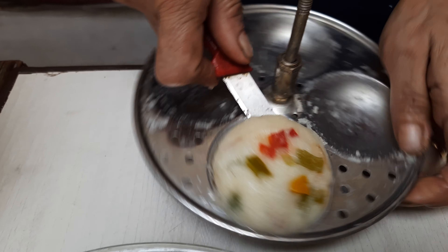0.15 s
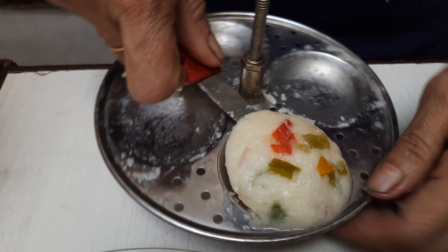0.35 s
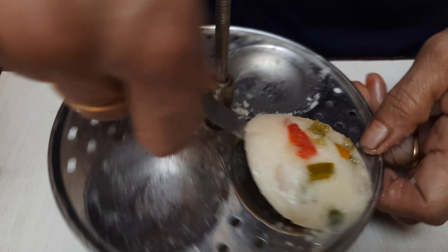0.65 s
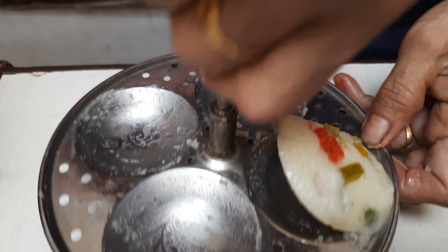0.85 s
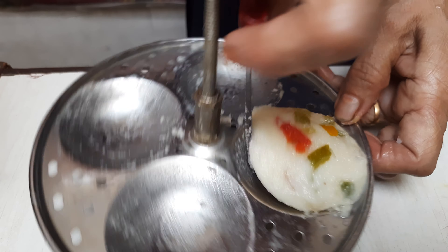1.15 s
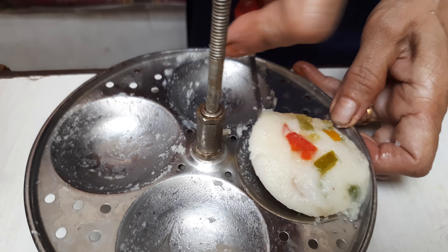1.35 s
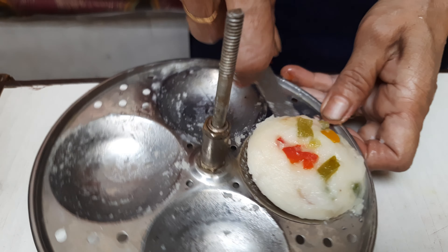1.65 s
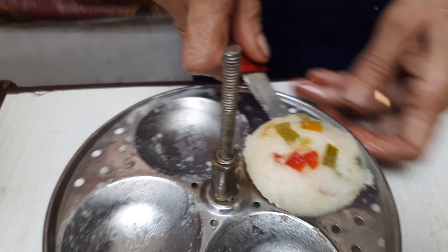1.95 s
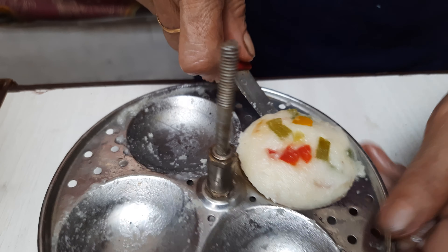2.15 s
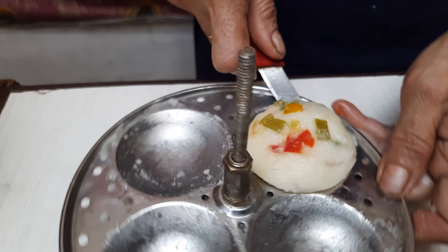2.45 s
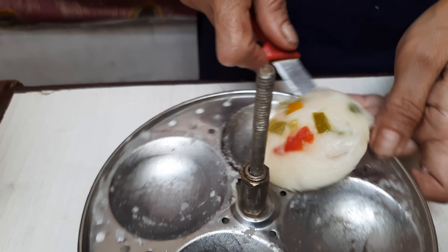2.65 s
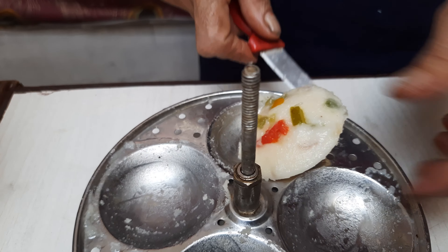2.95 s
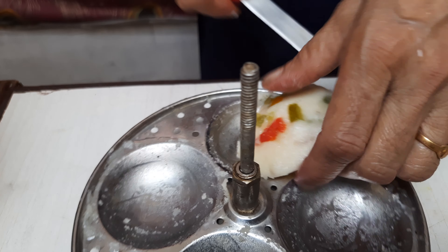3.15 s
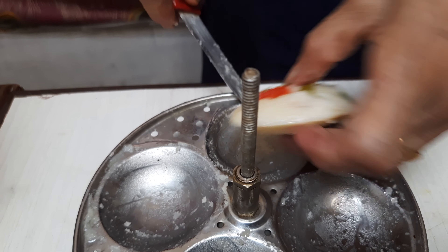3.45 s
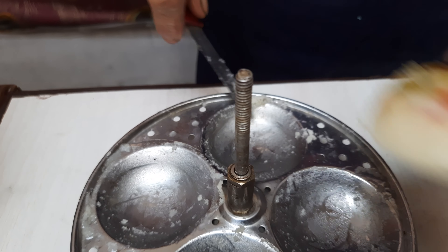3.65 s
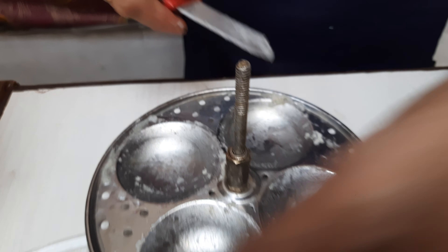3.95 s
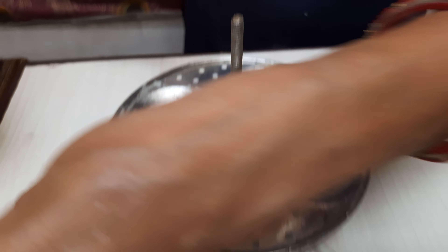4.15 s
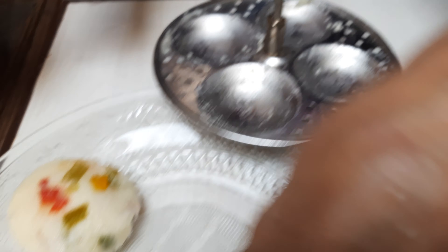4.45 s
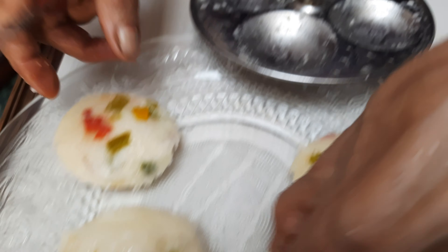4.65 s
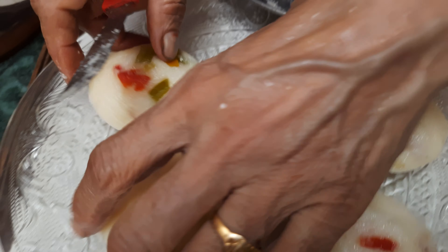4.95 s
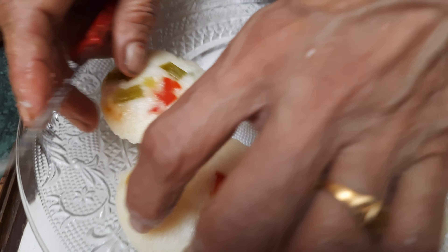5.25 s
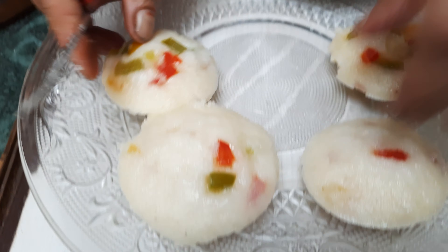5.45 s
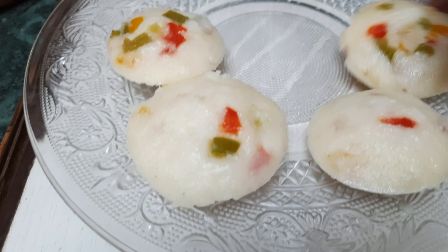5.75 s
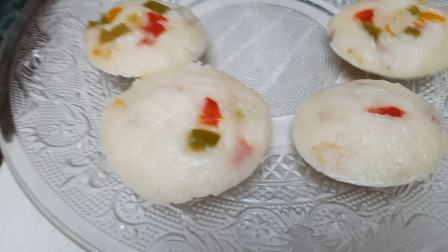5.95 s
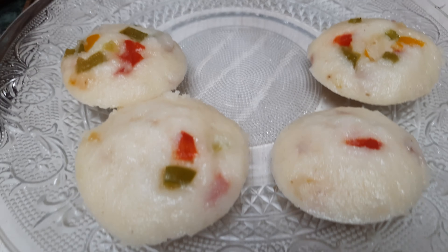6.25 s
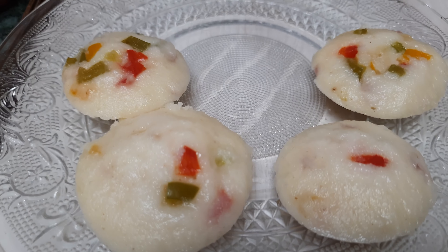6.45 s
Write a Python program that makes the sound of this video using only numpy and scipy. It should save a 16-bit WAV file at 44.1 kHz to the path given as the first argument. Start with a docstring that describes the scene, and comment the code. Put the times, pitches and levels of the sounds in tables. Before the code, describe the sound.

Close metallic scraping, hollow clanks and tiny bangle tinks as a steamed cake is pried loose, set softly on glass, before the steel mould clatters down.

```python
"""Prying a rice cake from a steel mould

A steamed rice cake is pried out of a hand-held steel idli mould with a knife, close by in a small kitchen.
The blade scrapes and knocks, made of friction clicks and short blows that ring banks of steel modes.
The mould bumps on the table, bangles tink as very high partials, and the cake lands on a glass plate
as dull noise pats. At the end the mould clatters down and rings, over room air and a wavering drone.
"""
import sys
import numpy as np
from scipy import signal
from scipy.fft import rfft, irfft
from scipy.io import wavfile

SR = 44100
rng = np.random.default_rng(int(sys.argv[2]) if len(sys.argv) > 2 else 0)


def to_wav(s):
    """Save 16-bit WAV."""
    ch = np.atleast_2d(s).T  # columns
    pcm = np.round(np.clip(ch, -1, 1) * 32767)  # PCM
    wavfile.write(sys.argv[1], SR, pcm.astype(np.int16))


N = 290178
TIME = np.arange(N) / SR
RING_TIME = np.arange(SR // 2) / SR  # half a second for every single hit

# Quiet room air. Each row: frequency in Hz, relative level in dB.
AIR_SPECTRUM = [(15, -63), (25, -28.5), (76, -9), (123, -14.5), (157, -20.5), (180, -22.5), (217, -17.5),
                (375, -26.5), (439, -19.5), (520, -30), (1070, -48), (1900, -48), (2650, -45.5),
                (3400, -69), (5000, -56), (7500, -67.5), (8800, -50.5), (11300, -48), (16000, -63.5)]
# Wavering low drone. Each row: time in seconds, centre pitch in Hz, centre level in dB.
DRONE = [(0.0, 64, -71.5), (4.15, 79, -60.5), (4.68, 58.9, -46.5), (4.9, 66.8, -73), (5.05, 81.6, -41.5),
         (5.42, 61.34, -52), (5.72, 55.85, -44.5), (6.2, 77.6, -46.5), (6.58, 71.4, -49)]
# The blade under the cake. Each row: time in seconds, dry rasp in dB, wet crackle in dB before its trim.
SCRAPE_LEVELS = [(0.0, -54.5, -53.5), (0.4, -54, -83), (0.63, -71, -52), (0.74, -46.5, -63),
                 (0.95, -81, -63), (1.07, -64, -70), (1.145, -59, -48), (1.18, -50, -64), (1.3, -50, -55),
                 (1.55, -57, -66.5), (1.88, -44.5, -48.5), (1.99, -49.5, -53.5), (2.08, -72.5, -67.5),
                 (2.27, -50, -76.5), (2.45, -48.5, -54), (2.62, -42.5, -44.5), (2.82, -101, -77),
                 (3.08, -66, -58.5), (3.28, -70, -74), (3.5, -70, -56), (3.62, -75, -84), (3.9, -60, -68)]
# The mould rubbing on the table. Each row: time in seconds, level in dB before DRAG_TRIM_DB.
DRAG_LEVELS = [(0.0, -49.5), (1.14, -46), (1.63, -74), (1.87, -38), (2.27, -97), (2.44, -34.5), (2.84, -43),
               (3.16, -52.5), (3.61, -54.5), (4.1, -60)]
# Colour of the dry rasp. Each row: frequency in Hz, relative level in dB.
RASP_SPECTRUM = [(400, -14), (1200, 10), (2600, 0), (3500, -10), (4600, -4.5), (6000, -34), (8000, -6),
                 (16000, -21)]
# Colour of the wet crackle and the rustle. Each row: frequency in Hz, relative level in dB.
CRACKLE_SPECTRUM = [(1500, -8), (3000, -3), (6000, -8), (7700, -12), (9000, -7), (11500, -6.5),
                    (16000, -8.5)]
# Steel sliding on steel or table with a hoarse tone.
# Each row: start in seconds, end in seconds, start pitch in Hz, end pitch in Hz, level in dB.
STROKES = [(0.09, 0.184, 755, 1104, -47.5), (0.498, 0.783, 1497, 1558, -46.5),
           (0.768, 0.881, 719, 777, -39), (0.909, 1.045, 1170, 1162, -36.5),
           (1.106, 1.17, 4250, 4290, -38.5), (1.055, 1.207, 1350, 1144, -48.5),
           (1.204, 1.297, 685, 865, -44), (1.195, 1.543, 4860, 4750, -56), (1.295, 1.447, 984, 1124, -46),
           (1.534, 1.747, 1234, 1311, -51.5), (1.689, 1.877, 1305, 1140, -39.5),
           (2.148, 2.286, 1090, 970, -54), (2.258, 2.43, 14900, 13500, -47),
           (2.512, 2.641, 760, 943, -43.5), (2.517, 2.608, 440, 564, -37), (3.44, 3.56, 1690, 1793, -55),
           (3.746, 3.884, 851, 782, -55.5)]
# Blows on the mould. Each row: time in seconds, clang in dB, thud in dB above the clang before its shares,
# thud pitch in Hz, contact hardness in dB, ringing in dB above the clang, number of rebounds.
KNOCKS = [(0.194, -36, -2, 660, -3.5, -27, 1), (0.257, -22.5, -4.5, 695, 2.5, -10.5, 1),
          (0.499, -34.5, -4.5, 446, -12, -23, 0), (0.513, -36.5, -2.5, 420, 1, -29, 0),
          (0.56, -41, -3.5, 424, 5.5, -12, 0), (0.659, -39.5, -3, 449, -7, -6, 1),
          (0.752, -19, -3.5, 505, -4, -17, 0), (0.764, -28, -3.5, 505, 0, -10, 1),
          (0.778, -37.5, 3, 504, 6, 2, 0), (0.796, -34.5, 9.5, 477, 6, -8, 1),
          (0.818, -38, -4, 750, 3, -12, 2), (0.843, -27.5, -11, 230, 7, -29, 1),
          (1.186, -19, 0, 676, -2, -13, 0), (1.196, -28, -8.5, 300, -5, -29, 0),
          (1.202, -22, -2.5, 750, -2.5, -26, 0), (1.218, -33.5, -6.5, 150, 6, -26, 0),
          (1.795, -33, 7, 510, -3.5, -17, 0), (1.825, -42, 4, 420, 6, -8, 1),
          (1.863, -44, 4, 270, 9, -8, 0), (1.914, -27, -1.5, 560, -0.5, -10.5, 0),
          (1.95, -29, 0, 622, 0, -16, 1), (2.279, -22, 2.5, 570, 0, -9, 0),
          (2.287, -22, -6, 730, 1.5, -11, 0), (2.337, -16.5, -8.5, 650, 3.5, -16.5, 0),
          (2.683, -36.5, -23, 400, 13.5, -4.5, 0), (2.709, -35, 0.5, 470, 8, 0, 0),
          (2.792, -26, 10, 518, -1, -18, 0), (2.811, -29, -7.5, 420, 9.5, -17.5, 0),
          (2.951, -48.5, -2, 420, 10, -30, 1), (3.056, -48.5, 5, 414, 8.5, -15, 0),
          (3.319, -55, -8, 420, 13, -5, 0), (3.356, -31, -4, 417, 13, -14.5, 0),
          (3.675, -32.5, -2.5, 760, 14, -14, 0), (4.259, -64, 0.5, 270, 3, -9.5, 0),
          (4.589, -34.5, 1.5, 756, 2, -8, 1), (6.001, -48.5, -17.5, 500, 8, -13.5, 0),
          (6.024, -42, 1.5, 526, 8, -13.5, 1), (6.078, -45.5, -8.5, 748, 2, -15.5, 0),
          (6.357, -18, -8, 718, 5, -13, 0), (6.362, -19, -7.5, 725, -6, -6.5, 1),
          (6.385, -24.5, -24, 760, 10.5, -13, 1), (6.404, -22, -10, 520, -17, -26, 0),
          (6.416, -26, -9, 580, 3, -1, 4), (6.477, -23.5, -7.5, 706, -1, -8, 0),
          (6.486, -29.5, -6.5, 520, -20, -7, 0), (6.495, -27, -5, 587, -7, -5.5, 1)]
# Resonances of the dished steel. Each row: centre in Hz, width in Hz, level in dB (halved in use).
BODY_RESONANCES = [(153, 34, -13.5), (279, 67, 3), (397, 136, 7.5), (684, 110, -3), (1030, 37, -33.5),
                   (1385, 89, -28.5), (1757, 68, -21), (1960, 120, -21.5), (2310, 270, -8.5),
                   (2590, 100, -9.5), (3440, 6.3, -26), (3800, 36, 1), (4130, 84, -11.5), (3970, 61, -25),
                   (4860, 190, -16.5), (5640, 50, -29), (6030, 110, -48), (6360, 120, -21.5)]
# The sheet's clearest partials. Each row: frequency in Hz, level in dB, t60 in seconds.
MOULD_MODES = [(690, -7, .3), (950, -4, .15), (1163, -11, .2), (1368, 1, .24), (1420, -4, .12),
               (1520, -2, .24), (1755, 3, .16), (1840, -4, .12), (1925, -4, .26), (2015, -10, .14),
               (2250, -8, .3), (2470, -10, .16), (2600, -10, .18), (2770, -6, .13), (3040, -12, .18),
               (3420, -16, .25), (3710, -10, .14), (4070, -9, .13), (4312, -16, .2), (4690, -13, .09)]
# Decay of the dense, quickly damped modes. Each row: frequency in Hz, t60 in seconds.
DENSE_MODE_T60 = [(150, 0.066), (600, 0.096), (1600, 0.052), (4000, 0.042), (8000, 0.042), (15000, 0.016)]
# Colour of a steel crash. Each row: frequency in Hz, relative level in dB.
STEEL_SPECTRUM = [(60, -21.5), (140, 2), (300, -1), (600, 8), (850, 1.5), (1100, 7.5), (1500, 16),
                  (2600, 8), (4400, 5.5), (5500, -3), (7700, -23.5), (9000, -14.5), (16000, -33)]
# Low modes of the whole stack, set off by the thud. Each row: frequency in Hz, level in dB, t60 in seconds.
STACK_MODES = [(146.5, 8, 0.084), (269.2, 0, 0.32), (419.4, -3, 0.1), (455, 2, 0.063), (490.5, -4, 0.09),
               (579.4, -3, 0.047), (707.5, 0.5, 0.049), (764, -2, 0.068), (823, -1, 0.058)]
# Stereo balance of the mould. Each row: frequency in Hz, left minus right in dB.
MOULD_BALANCE = [(130, 0), (280, -3.5), (550, 2), (1100, 0.5), (2200, 6.5), (4200, 1), (8000, 0),
                 (14000, 23)]
# The blade hits the cup or the spindle. Each row: time in seconds, ring in dB, tick in dB above the ring.
BLADE_TAPS = [(0.751, -36, -27), (1.188, -41.5, -14), (3.359, -35.5, -2), (3.48, -52, -21),
              (3.509, -54, -12), (3.674, -38.5, -8.5), (3.778, -51.5, -13)]
# Partials of the blade. Each row: frequency in Hz, level in dB, t60 in seconds.
BLADE_MODES = [(2440, -1, .09), (2490, -5, .22), (2860, 1, .09), (3570, -5, .15), (4780, 2, .1),
               (4950, -1, .05), (5170, -4, .08), (5590, -8, .11), (5880, -6, .08), (6380, -10, .06),
               (7100, -4, .075), (7590, -6, .05), (8070, -8, .06), (9135, -11, .06), (10960, -10, .07)]
# Pass band of the blade's tick: low edge in Hz, high edge in Hz.
BLADE_TICK_BAND = (7500, 13000)
# Bangles touching. Each row: time in seconds, level in dB, treble tilt reached at 14 kHz in dB.
TINKS = [(0.908, -57, -3), (1.686, -43, -3), (2.365, -55, 3), (3.1, -37, -16.5), (4.6207, -34, -2.5),
         (4.814, -49, -9), (5.639, -37.5, 5), (5.6691, -22, -7.5), (5.807, -58, -1.5), (5.818, -38.5, 3),
         (6.117, -49, 0), (6.368, -16, -20.5)]
# Partials of the bangles. Each row: frequency in Hz, level in dB, t60 in seconds.
BANGLE_MODES = [(6700, -18, .08), (8660, -18, .16), (9470, -13, .08), (10560, -9, .09), (11250, -4, .13),
                (11320, -5, .1), (11400, -5, .11), (12290, -6, .11), (13100, -11, .06), (14340, -9, .12),
                (14500, -11, .08), (15500, -12, .09)]
# The hand at the plate. Each row: time in seconds, dull rub in dB before its trim, fine rustle in dB.
BRUSH_LEVELS = [(4.0, -75, -80.5), (4.56, -92, -78.5), (4.61, -31.5, -71), (4.78, -62, -66.5),
                (4.99, -73, -60), (5.2, -95.5, -64), (5.38, -59, -77), (5.46, -58, -58), (5.56, -58, -50),
                (5.63, -51, -51.5), (5.71, -72, -51.5), (5.81, -68, -65), (6.14, -88, -65),
                (6.35, -85, -69.5)]
# Pass band of the dull rub: low edge in Hz, high edge in Hz.
RUB_BAND = (1800, 2900)
# Cake and fingers on the glass plate. Each row: time in seconds, level in dB.
PATS = [(4.499, -44), (4.526, -54), (4.941, -43.5), (4.959, -57), (5.05, -54), (5.935, -54.5)]
# Colour of a soft pat. Each row: frequency in Hz, relative level in dB.
SOFT_SPECTRUM = [(50, -28), (150, -1), (330, -7), (600, -20), (2200, -13.5), (7500, -16.5), (10000, -25),
                 (16000, -47)]
# Shares of a pat: thud, clang, edge and tick band, each in dB.
PAT_BANDS_DB = (0, -12, -17, -22)
# Steel touching the rim of the glass plate. Each row: time in seconds, level in dB, t60 in seconds.
PINGS = [(4.592, -42, .22), (6.022, -47, .1), (6.032, -45, .3), (6.487, -32.5, .2)]
# Partials of the glass. Each row: frequency in Hz, level in dB, share of the ping's t60.
GLASS_MODES = [(1900, -9, .8), (2748, 0, 1), (3688, -5, .5), (4740, -4, .3), (5841, -9, .35)]
# Edges between thud, clang, edge and tick: frequencies in Hz.
BAND_EDGES = (70, 900, 2500, 6000, 17000)
# Stereo width. Each row: frequency in Hz, side minus mid in dB.
WIDTH = [(60, -13), (150, -13.5), (550, -8.5), (1100, -5.5), (2200, 2), (14000, 1.5)]
# Reflections off table and dishes. Each row: left delay in ms, right delay in ms, level in dB.
REFLECTIONS = [(.62, 1.1, -16.5), (1.4, 1.25, -19), (2.45, 2.4, -18.5), (3.75, 3.2, -14.5), (5.9, 6.2, -25)]
# Colour of the room echo. Each row: frequency in Hz, level in dB.
ECHO_SPECTRUM = [(100, 5.5), (400, -6), (1500, -11.5), (4000, -13.5), (8000, -11), (14000, -12.5)]
# Decay of the room echo. Each row: frequency in Hz, t60 in seconds.
ECHO_T60 = [(150, 0.5), (600, 0.45), (2500, 0.62), (6000, 0.53), (14000, 0.47)]

TOP_HZ = 16100
AIR_DB, AIR_SWELL_DB, AIR_SWELLS_PER_S = -52.5, 1.8, 2
CRACKLE_TRIM_DB, DRAG_TRIM_DB, RUB_TRIM_DB = 1.5, -8.5, -7.5
SPOTS_PER_S, SPOT_SWING_DB, DRY_FRICTION_DB = 14, 4, -6  # the blade's travel; friction heard without the sheet
STROKE_WANDER = .035  # the contact point jumps about; share of the centre pitch
STROKE_WIDTH_SHARE, STROKE_FADE_S = .2, 0.044  # width against the start pitch; attack and release
EDGE_DB, TICK_DB, EDGE_PER_HARDNESS = -4, -11, 0.6  # against the clang; a harder contact lifts both
EDGE_TOP_DB = -2  # the hardest taps gain only tick
REBOUND_GAP_S, REBOUND_JITTER = .0105, 0.2047  # mean gap; random share of it
REBOUND_LOSS_DB, REBOUND_THUD_DB = -5, -5  # lost at each rebound; rebounds have less thud than the blow
REBOUND_HARDNESS_DB = 0.5  # rebounds land on the bare rim
STACK_DB, DULL_THUD_DB = -3.5, -2  # the tuned and the toneless share of the thud
STACK_FOCUS_DB_PER_OCT = 28  # modes away from the thud's pitch are hardly set off
STACK_SWELL_S = 0.00062  # time for the blow to spread through the plates
GRIP_DETUNE = .006  # the grip shifts each partial by about this share
BANGLE_PAN_DB = 9.5  # left minus right


def undb(db):
    """Decibels to gain."""
    return 10 ** (np.asarray(db) / 20)


def unit(x):
    """Scale to rms 1."""
    return x / np.sqrt(np.mean(x ** 2))


def onset_unit(x):
    """Scale to rms 1 over the first 20 ms."""
    return x / np.sqrt(np.mean(x[:, :SR // 50] ** 2))


def curves(table):
    """Draw the columns of a timed table as curves, one value per sample."""
    s, *columns = np.transpose(table)
    return [np.interp(TIME, s, column) for column in columns]


def lookup(table, hz):
    """Read (Hz, value) points on a log-frequency axis."""
    f, value = np.transpose(table)
    return np.interp(np.log(hz + 1), np.log(f), value)


def panned(db):
    """Left and right gains that differ by db."""
    return undb(np.array([[db], [-db]]) / 2)


def add(out, s, x):
    """Mix x in at time s."""
    i = max(int(s * SR), 0)
    out[:, i:i + x.shape[1]] += x[:, :N - i]


def colour(x, spectrum, size=1024):
    """Causal filter through (Hz, dB) points, from the cepstrum of the log gain."""
    hz = np.arange(size // 2 + 1) * SR / size
    cepstrum = irfft(np.log(undb(lookup(spectrum, hz))))
    # folding the cepstrum forward makes the filter minimum phase
    cepstrum[1:size // 2] *= 2
    cepstrum[size // 2 + 1:] = 0
    response = irfft(np.exp(rfft(cepstrum)))
    return signal.fftconvolve(x, response[None], axes=1)[:, :x.shape[1]]


def band(x, lo, hi):
    """Causal band-pass."""
    edges = [lo, min(hi, SR / 2 - 100)]
    return signal.sosfilt(signal.butter(2, edges, "band", fs=SR, output="sos"), x)


def balanced(x, balance):
    """Tilt a sound to the left or right, band by band."""
    left = colour(x[[0]], [(hz, db / 2) for hz, db in balance])
    right = colour(x[[1]], [(hz, -db / 2) for hz, db in balance])
    return np.vstack([left, right])


def spread(x):
    """Two signals become mid and side: left and right are alike in the bass, unlike in the treble."""
    side = colour(x[1:], WIDTH)[0]
    return np.array([x[0] + side, x[0] - side])


def noise(count):
    """Stereo noise."""
    return spread(rng.standard_normal((2, count)))


def walk(rate):
    """Slow chance: straight lines between random knots, rate knots per second, with a spread just under 1."""
    knots = rng.standard_normal(1200)
    return np.interp(TIME * rate, np.arange(len(knots)), knots)


def decay_curve(t60):
    """Exponential decay by 60 dB in t60 seconds."""
    return np.exp(-np.log(1000) * RING_TIME / t60)


def swell_curve(rise_s):
    """Exponential rise towards 1."""
    return 1 - np.exp(-RING_TIME / rise_s)


def burst(t60, contact_s):
    """Noise with a quick swell and a decay, like countless close modes set off together."""
    return noise(len(RING_TIME)) * decay_curve(t60) * swell_curve(contact_s)


def random_weights(count):
    """Chance strength and phase of each mode in two channels."""
    return rng.standard_normal((2, count)) + 1j * rng.standard_normal((2, count))


def ring(modes, scatter_db, detune=0):
    """Decaying partials whose strength, phase and tuning vary by chance from hit to hit."""
    hz, db, t60 = np.transpose(modes)
    strength = undb(db + scatter_db * rng.standard_normal((2, len(hz))))
    weights = strength * np.exp(2j * np.pi * rng.random((2, len(hz))))
    tuned_hz = hz * (1 + detune * rng.standard_normal(len(hz)))
    poles = 2j * np.pi * tuned_hz - np.log(1000) / t60
    partials = (weights @ np.exp(poles[:, None] * RING_TIME[:SR // 4])).imag
    return onset_unit(np.pad(partials, [(0, 0), (0, len(RING_TIME) - SR // 4)]))


def voiced(x, band_db):
    """Place and hardness of a contact set the shares of thud, clang, edge and tick."""
    out = 0
    for db, lo, hi in zip(band_db, BAND_EDGES, BAND_EDGES[1:]):
        out = out + undb(db) * onset_unit(band(x, lo, hi))
    return out


def dense_modes(count=230):
    """The thin dished sheet has many irregularly spaced modes; one decaying row for each."""
    place = (np.arange(count) + rng.random(count)) / count
    hz = 100 + 16000 * place ** 1.7
    poles = 2j * np.pi * hz - np.log(1000) / lookup(DENSE_MODE_T60, hz)
    return np.exp(poles[:, None] * RING_TIME[:SR // 10])


def steel_body(x, direct):
    """The mould's resonances, over a direct share for the dense modes that lie between them."""
    out = direct * x
    for hz, width, db in BODY_RESONANCES:
        out = out + undb(db / 2) * signal.lfilter(*signal.iirpeak(hz, hz / width, SR), x)
    return out


def strike(modes, crack_db=-5, push_db=-13, contact_s=0.0018, push_s=0.00017):
    """One contact: the push of the blow, a short crack, and the sheet's modes in chance shares."""
    sheet = spread((random_weights(len(modes)) @ modes).imag)
    sheet = np.pad(sheet, [(0, 0), (0, len(RING_TIME) - modes.shape[1])]) * swell_curve(contact_s)
    push = RING_TIME[None] * np.exp(-RING_TIME / push_s)
    crack = burst(t60=0.019, contact_s=contact_s)
    return onset_unit(sheet) + undb(crack_db) * onset_unit(crack) + undb(push_db) * onset_unit(push)


def blow(modes, db, thud_db, hardness_db, partials_db):
    """One short steel crash, brighter for a harder contact, and the partials that it leaves ringing."""
    crash = colour(steel_body(strike(modes), direct=0.3), STEEL_SPECTRUM)
    edge_db = min(EDGE_DB + EDGE_PER_HARDNESS * hardness_db, EDGE_TOP_DB)
    bands_db = (thud_db, 0, edge_db, TICK_DB + hardness_db)
    partials = onset_unit(spread(ring(MOULD_MODES, scatter_db=2.5, detune=GRIP_DETUNE)))
    return undb(db) * (voiced(crash, bands_db) + undb(partials_db) * partials)


def slips(rate, scatter_db):
    """Stick-slip friction: a train of tiny clicks of uneven size, about rate of them per second."""
    size = undb(scatter_db * np.minimum(rng.exponential(size=N), 5))
    happens = rng.random(N) < rate / SR
    return spread(rng.standard_normal((2, N)) * size * happens)


def kitchen():
    """Quiet room air as coloured noise, and a low sine drone that wavers in pitch and level."""
    air = unit(colour(noise(N), AIR_SPECTRUM, size=8192))
    air = air * undb(AIR_DB + AIR_SWELL_DB * walk(AIR_SWELLS_PER_S))
    hz, db = curves(DRONE)
    phase = 2 * np.pi * np.cumsum(hz * (1 + 0.0696 * walk(25))) / SR
    return air + np.sin(phase) * undb(db + 1.4 * walk(2.2))


def travelling(x, count=4):
    """Friction rings the sheet at several spots, each with its own mix of modes, that fade up and down."""
    modes, out = dense_modes(count=130), 0
    for _ in range(count):
        spot = (random_weights(len(modes)) @ modes).imag
        nearness = undb(SPOT_SWING_DB * walk(SPOTS_PER_S))
        out = out + signal.fftconvolve(x * nearness, spot, axes=1)[:, :N]
    return unit(unit(spread(out)) + undb(DRY_FRICTION_DB) * unit(x))


def chatter():
    """The blade skips over crumbs and holes; every skip is a tiny blow that rings the steel."""
    skips = slips(rate=70, scatter_db=2.2)[:1]
    skip = blow(dense_modes(), 0, thud_db=-1, hardness_db=-5, partials_db=-1)
    return unit(signal.fftconvolve(skips, skip, axes=1)[:, :N])


def scraping(catch_db=-3, uneven_db=2.0):
    """The blade rasps in fine slips and rarer catches; moist cake tears and the mould drags on the table."""
    rasp_db, crackle_db = curves(SCRAPE_LEVELS)
    drag_db, = curves(DRAG_LEVELS)
    pressure = undb(uneven_db * walk(25))

    fine = unit(slips(rate=3000, scatter_db=3))
    catches = unit(slips(rate=110, scatter_db=2)) * undb(catch_db)
    grit = unit(colour(steel_body(travelling(fine + catches), direct=0.27), RASP_SPECTRUM))
    rasp = (grit + chatter()) * undb(rasp_db)

    tearing = slips(rate=1500, scatter_db=3)
    crackle = unit(colour(travelling(tearing), CRACKLE_SPECTRUM)) * undb(crackle_db + CRACKLE_TRIM_DB)

    judder = slips(rate=1300, scatter_db=3)
    drag = unit(band(steel_body(judder, direct=0.38), 140, 800)) * undb(drag_db + DRAG_TRIM_DB)

    lifted = np.interp(TIME, [3.85, 4.0], [1, 0])  # the blade leaves the cup
    return ((rasp + crackle) * pressure + drag) * lifted * panned(3.55)


def gliding_band(hz, width_hz):
    """Random excitation in a resonance whose centre moves: slow noise shifted up to the centre."""
    lowpass = signal.butter(2, width_hz / 2, fs=SR, output="sos")
    slow = signal.sosfilt(lowpass, rng.standard_normal((2, 2, len(hz))))
    carrier = np.exp(2j * np.pi * np.cumsum(hz) / SR)
    return unit(((slow[0] + 1j * slow[1]) * carrier).real)


def sliding(catch_db=2.0, judder_db=2.5):
    """Strokes set in, catch, judder and let go; their resonance glides and wanders with the contact point."""
    out = np.zeros((2, N))
    for start, end, start_hz, end_hz, db in STROKES:
        length = end - start
        wander = 1 + STROKE_WANDER * walk(30)[:len(RING_TIME)]
        hz = np.interp(RING_TIME, [0, length], [start_hz, end_hz]) * wander
        envelope = np.clip(np.minimum(RING_TIME, length - RING_TIME) / STROKE_FADE_S, 0, 1)
        tone = unit(spread(gliding_band(hz, STROKE_WIDTH_SHARE * start_hz)))
        add(out, start, undb(db) * envelope * tone)
    return out * undb(catch_db * walk(40) + judder_db * walk(170)) * panned(3.3)


def stack(thud_hz):
    """The hollow thunk of the stacked plates; the place of the blow picks out the modes near one pitch."""
    modes = []
    for hz, db, t60 in STACK_MODES:
        octaves_away = abs(np.log2(hz / thud_hz))
        modes.append((hz, db - STACK_FOCUS_DB_PER_OCT * octaves_away, t60))
    partials = ring(modes, scatter_db=2, detune=GRIP_DETUNE)
    return onset_unit(spread(partials) * swell_curve(STACK_SWELL_S))


def mould():
    """Blows with hollow thunk and fading rebounds; partials sing louder where the hand damps them less."""
    out, modes = np.zeros((2, N)), dense_modes()
    for s, db, thud_db, thud_hz, hardness_db, partials_db, rebounds in KNOCKS:
        add(out, s, undb(db + thud_db + STACK_DB) * stack(thud_hz))
        for k in range(rebounds + 1):
            rebound = k > 0
            hit = blow(modes, db + k * REBOUND_LOSS_DB,
                       thud_db + DULL_THUD_DB + rebound * REBOUND_THUD_DB,
                       hardness_db + rebound * REBOUND_HARDNESS_DB, partials_db)
            add(out, s, hit)
            s += REBOUND_GAP_S * (1 + REBOUND_JITTER * rng.standard_normal())
    return balanced(out, MOULD_BALANCE)


def knife():
    """The thin blade's edge ticks, and the blade rings briefly with high, clear partials."""
    out = np.zeros((2, N))
    for s, db, tick_db in BLADE_TAPS:
        tick = onset_unit(band(burst(t60=0.02, contact_s=0.00039), *BLADE_TICK_BAND))
        partials = ring(BLADE_MODES, scatter_db=2.5, detune=GRIP_DETUNE)
        add(out, s, undb(db) * (partials + undb(tick_db) * tick))
    return balanced(out, MOULD_BALANCE)


def bangles(tick_db=-11, ring_db=-7.0):
    """Small hard rings: a bright noise tick and a cluster of very high partials."""
    out = np.zeros((2, N))
    for s, db, top_db in TINKS:
        tick = onset_unit(band(burst(t60=0.063, contact_s=0.0002), 9300, TOP_HZ))
        partials = ring(BANGLE_MODES, scatter_db=3, detune=GRIP_DETUNE / 2)
        tink = undb(tick_db) * tick + undb(ring_db) * partials
        add(out, s, undb(db) * colour(tink, [(9000, 0), (14000, top_db)]))
    return out * panned(BANGLE_PAN_DB)


def brushing():
    """Friction grains and stray ticks, a dull rub and a rustle, as the hand lays the cake down and withdraws."""
    rub_db, rustle_db = curves(BRUSH_LEVELS)
    moving = np.interp(TIME, [3.9, 4.0, 6.2, 6.35], [0, 1, 1, 0])
    grains = unit(slips(rate=5000, scatter_db=2.5))
    ticks = .4 * unit(slips(rate=22, scatter_db=1.5))
    uneven = (grains + ticks) * undb(2 * walk(35))
    rub = unit(band(uneven, *RUB_BAND)) * undb(rub_db + RUB_TRIM_DB)
    rustle = unit(colour(uneven, CRACKLE_SPECTRUM)) * undb(rustle_db)
    return (rub + rustle) * moving


def plate():
    """Soft cake and fingertips land on the glass with dull pats; steel on its rim makes it ping."""
    out = np.zeros((2, N))
    for s, db in PATS:
        pat = colour(burst(t60=0.26, contact_s=0.00012), SOFT_SPECTRUM)
        add(out, s, undb(db) * voiced(pat, PAT_BANDS_DB))
    for s, db, t60 in PINGS:
        modes = np.array(GLASS_MODES) * [1, 1, t60]
        add(out, s, undb(db) * ring(modes, scatter_db=1)[:1])  # one channel feeds both sides
    return out


def table_top(x):
    """Near surfaces return each sound within milliseconds and comb its spectrum."""
    response = np.zeros((2, SR // 100))
    response[:, 0] = 1
    for *delays_ms, db in REFLECTIONS:
        delays = (np.array(delays_ms) * SR / 1000).astype(int)
        response[[0, 1], delays] += undb(db)
    return signal.fftconvolve(x, response / np.linalg.norm(response[0]), axes=1)[:, :N]


def room(x, build_s=0.0058):
    """Hard kitchen walls: a diffuse noise tail, one octave at a time, each with its own decay."""
    tail = 0
    for lo in 70 * 2. ** np.arange(8):
        decay = decay_curve(lookup(ECHO_T60, lo * np.sqrt(2)))
        tail = tail + band(rng.standard_normal((2, len(RING_TIME))), lo, 2 * lo) * decay
    tail = spread(tail) * swell_curve(build_s)
    tail = colour(tail / np.sqrt(np.sum(tail ** 2) / 2), ECHO_SPECTRUM)
    return signal.fftconvolve(x, tail, axes=1)[:, :N]


def scene():
    """All the handling, its echoes and the room's own sound."""
    near = scraping() + sliding() + mould() + knife() + bangles() + brushing() + plate()
    return table_top(near) + room(near) + kitchen()


def record(dry):
    """A steep low-pass cuts the top of the treble."""
    return signal.sosfilt(signal.ellip(10, .2, 80, TOP_HZ, fs=SR, output="sos"), dry)


dry = scene()
out = record(dry)
to_wav(out)
```